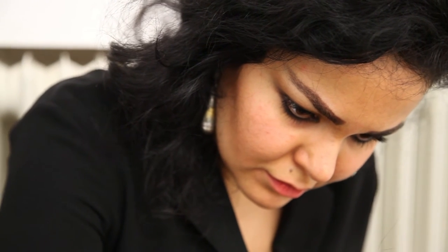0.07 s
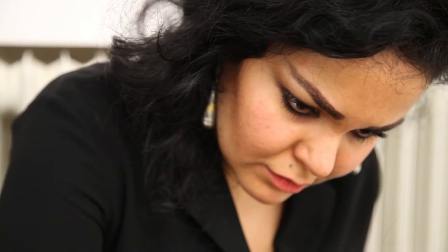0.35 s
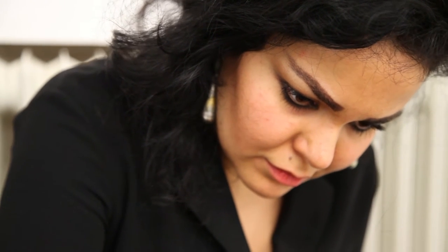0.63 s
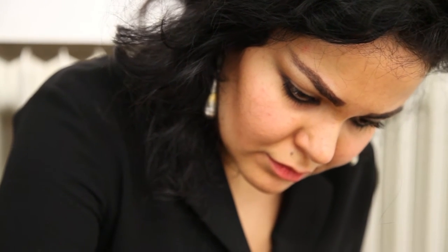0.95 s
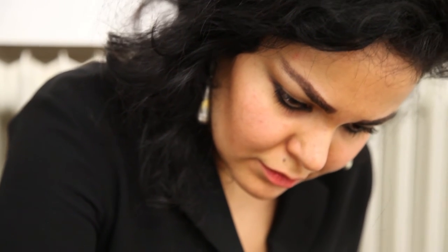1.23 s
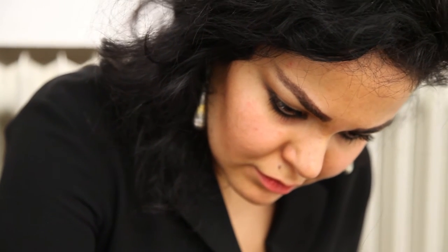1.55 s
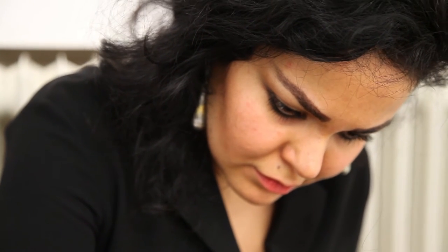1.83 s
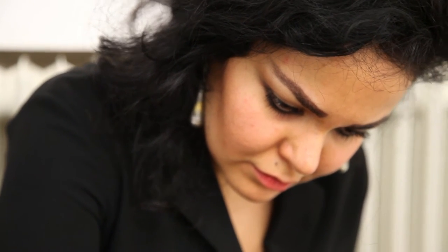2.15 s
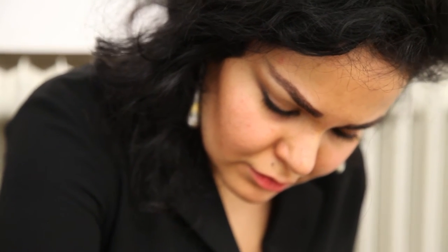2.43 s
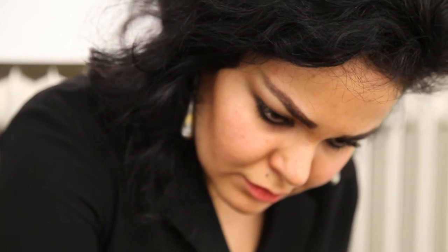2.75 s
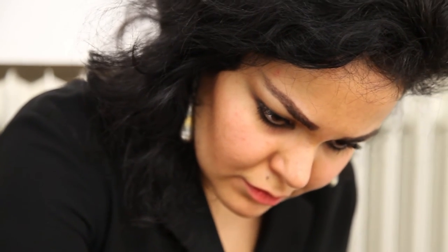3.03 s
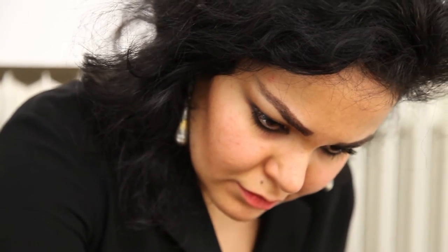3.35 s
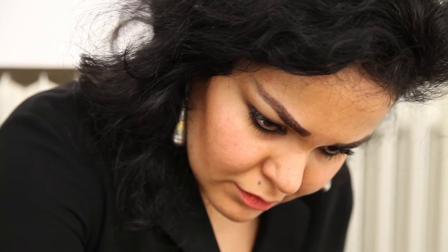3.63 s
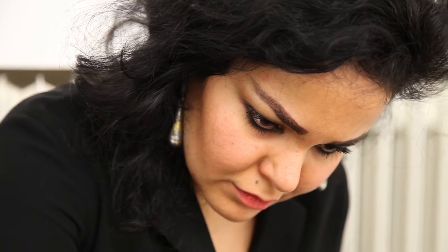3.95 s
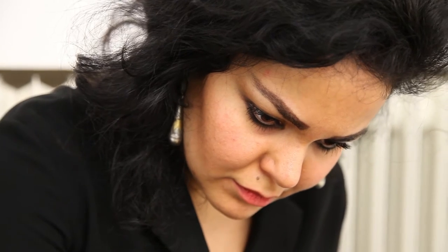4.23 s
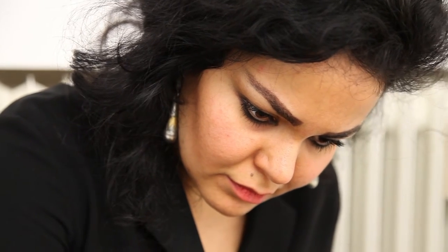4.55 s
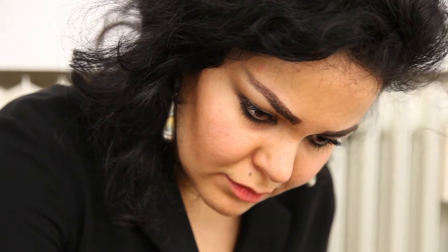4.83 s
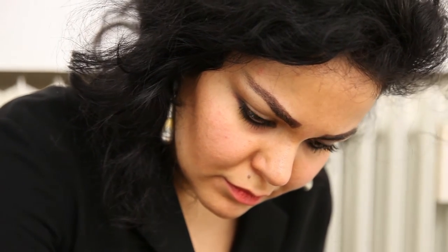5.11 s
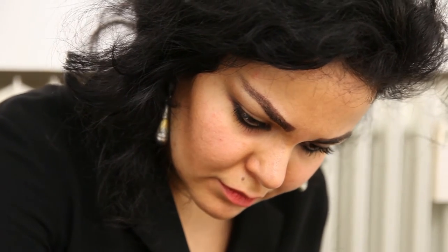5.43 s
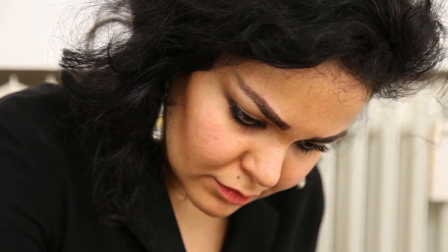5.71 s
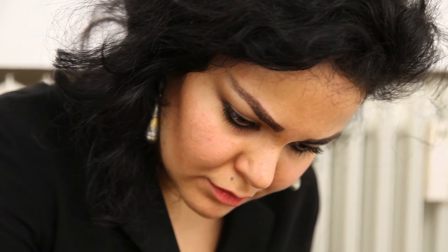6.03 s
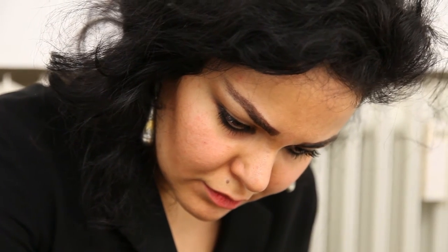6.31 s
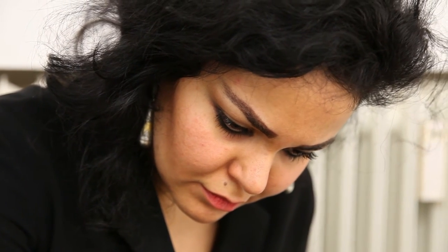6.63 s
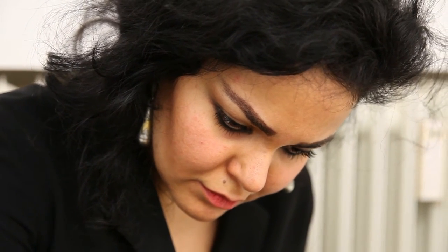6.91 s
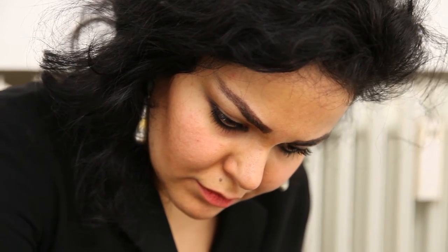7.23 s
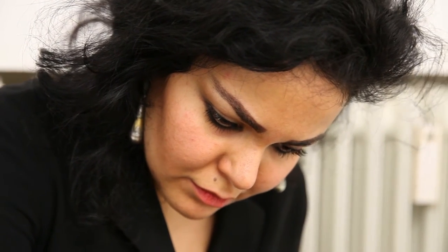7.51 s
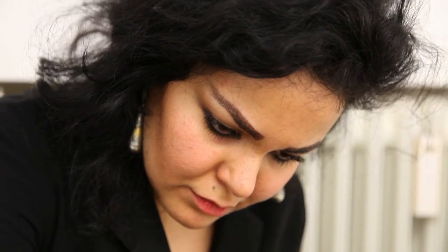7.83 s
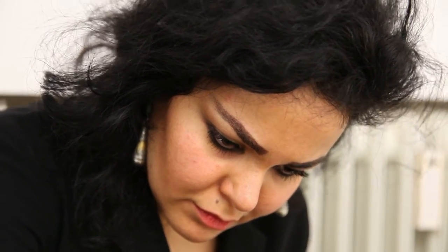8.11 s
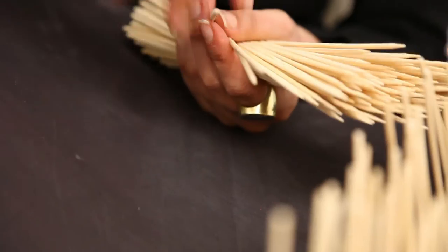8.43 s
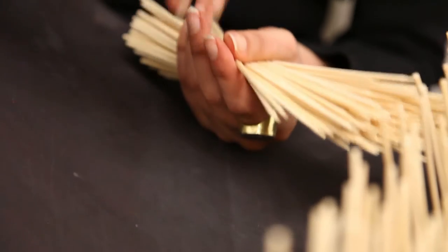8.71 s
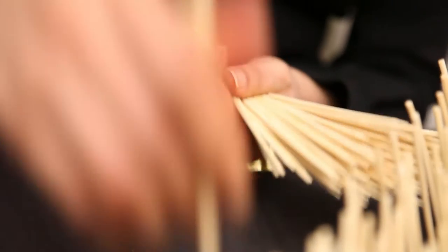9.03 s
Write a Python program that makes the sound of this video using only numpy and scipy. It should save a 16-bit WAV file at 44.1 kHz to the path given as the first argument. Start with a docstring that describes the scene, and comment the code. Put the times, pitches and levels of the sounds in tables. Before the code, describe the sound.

Close up in a small room with a constant soft hiss, wooden skewers are pushed into a cloth-covered form in two spells. Each mixes woody taps, short scrapes, fabric rustle and low bumps on the table. Before and between them come faint rubs and crisp clicks from the bundle. A quick swish of one skewer being drawn out leads into the second spell, which holds the deepest, loudest thump.

```python
"""Thin wooden skewers go into a fabric-covered form on a table, close-miked over steady hiss in a small room.
Skewers rub and their tips click as one is picked from the bundle. From 1.3 s hands work over the cloth:
shafts tap and ring, points scrape through the weave, and the pushes thump form and table.
Around 4.5 s the hands lift, leaving rubs and clicks in the bundle. At 6.6 s one shaft slides out,
and a second spell of pushing brings the heaviest thump, then eases off towards 9 s."""
import sys
import numpy as np
from scipy import signal
from scipy.fft import rfft, irfft
from scipy.io import wavfile
from scipy.ndimage import uniform_filter1d

SR = 44100
rng = np.random.default_rng(int(sys.argv[2]) if len(sys.argv) > 2 else 0)


def generate_wav(signal):
    """Clip the signal to [-1, 1] and save it as 16-bit WAV at the path in sys.argv[1]."""
    frames = np.transpose(np.atleast_2d(signal))
    scaled = np.clip(frames, -1, 1) * 32767
    pcm = np.round(scaled).astype(np.int16)
    wavfile.write(sys.argv[1], SR, pcm)


N = 399546
TIME = np.arange(N) / SR

# Cue levels are set ahead of each layer's gain; spectra give tone colour only.
# room tone: (frequency [Hz], level [dB])
HUSH_SPECTRUM = [(12, -36), (20, 3.5), (124, -2.5), (184, -7.5), (212, -7), (273, -8.5), (342, -8),
                 (521, -13), (888, -15), (2310, -19.5), (2580, -17), (3060, -20.5), (8170, -23.5),
                 (15200, -25.5), (16500, -35)]
# bumps on form and table: (time [s], level [dB], centre [Hz], clack relative to thump [dB])
KNOCK_CUES = [(0.004, -51.5, 350, -23), (0.657, -52.5, 201, -6), (1.387, -38.5, 366, -1),
              (1.496, -27.5, 210, -1.5), (1.657, -29, 118, -12), (2.051, -32.5, 220, -9),
              (2.103, -31.5, 125, -8), (2.224, -26.5, 295, -8.5), (2.525, -25, 205, -8.5),
              (2.548, -31, 169, -16), (2.5707, -19.5, 141, -12), (3.133, -36.5, 310, -3),
              (3.167, -30, 270, -1.5), (3.319, -34, 280, -7), (3.361, -33.5, 200, -9),
              (3.9665, -20, 241, -3.5), (3.986, -27.5, 250, -25), (4.071, -41, 453, -5),
              (4.192, -40, 530, -12), (6.845, -34, 120, -6), (7.062, -24, 175, -15.5),
              (7.285, -14, 107, -22), (7.578, -28.5, 408, -22), (7.76, -22.5, 146, -12),
              (7.787, -24, 146, -21), (8.081, -39, 66.4, -20), (8.358, -35.5, 286, -7),
              (8.525, -28, 131, -8), (8.737, -33.5, 304, -9), (8.98, -39, 372, -13)]
# resonances of the form on the table: (frequency [Hz], level [dB], t60 [s])
BODY_MODES = [(41, 4, 0.16), (86.6, -6.5, 0.19), (135, 0.5, 0.097), (184.7, 0.5, 0.059), (233, -0.5, 0.068),
              (292.5, 0, 0.072), (350.6, -5.5, 0.12), (434.7, -5, 0.13), (575.5, -5.5, 0.085),
              (816, -15, 0.1), (960, -2, 0.032)]
# low shudder of the loaded form: (frequency [Hz], level [dB])
RUMBLE_SPECTRUM = [(25, -14), (42, -4), (60, -1), (84, 9), (102, 6.5), (124, 6), (160, -4.5), (215, 2.5),
                   (290, 5), (360, 6.5), (430, 1.5), (500, -8), (610, -8.5), (720, -12.5), (900, -14.5),
                   (1400, -26.5), (2500, -62)]
# hard edge of a knock: (frequency [Hz], level [dB])
CLACK_SPECTRUM = [(200, -7.5), (450, 6.5), (650, 0.5), (950, 0), (1250, -14.5), (1700, -23), (4000, -31.5),
                  (16000, -63)]
# skewers rub within the bundle: (time [s], length [s], level [dB])
RUB_CUES = [(0.127, 0.11, -56.5), (0.439, 0.042, -54.5), (2.916, 0.043, -53), (3.026, 0.086, -54.5),
            (3.723, 0.16, -53), (3.985, 0.049, -51), (4.125, 0.13, -53.5), (4.358, 0.051, -51.5),
            (4.557, 0.08, -52), (4.963, 0.034, -51.5), (5.108, 0.25, -52), (5.448, 0.088, -50.5),
            (7.257, 0.035, -41), (8.192, 0.095, -52)]
# wood brushing wood: (frequency [Hz], level [dB])
RUB_SPECTRUM = [(1760, -27), (3000, -9.5), (4410, -5.5), (5220, -5.5), (5880, -3.5), (7510, 0.5),
                (12200, -9.5), (15100, -28), (16000, -83)]
# tips flick past each other: (time [s], level [dB], tip pitch [Hz])
CLICK_CUES = [(0.234, -27.5, 7600), (0.4713, -32, 8160), (4.366, -37, 8900), (4.629, -31, 7850),
              (4.7055, -38, 7560), (4.769, -30.5, 9300), (4.9766, -36, 8300), (5.5086, -33, 6900),
              (5.557, -25.5, 9700), (5.5824, -21.5, 7430), (5.598, -24, 9050), (6.572, -44, 8050),
              (7.0603, -32, 6800), (8.2404, -25, 9200), (8.2795, -34.5, 7510), (8.2946, -26.5, 8400),
              (8.9008, -33.5, 8400)]
# bright snap of a tip: (frequency [Hz], level [dB])
CLICK_SPECTRUM = [(800, -37), (2000, -15), (3500, -8.5), (6000, 3), (8200, 5.5), (10500, -6.5),
                  (16000, -18.5)]
# bending modes of a gripped skewer, split as it is not quite round: (multiple of pitch [ratio], level [dB])
SKEWER_MODES = [(.51, -0.5), (.62, -18), (.87, -34), (1.0, 9), (1.18, -8), (1.8, -13)]
# spells of work: (hands land [s], hardest press [s], hands gone [s], level at hardest press [dB])
HAND_SPELLS = [(1.276, 2.13, 4.486, -37.5), (6.77, 7.45, 9.4, -36)]
# hands on fabric: (frequency [Hz], level [dB])
CLOTH_SPECTRUM = [(350, -26.5), (600, 7.5), (812, 3), (984, 2), (1390, 1), (2150, 1.5), (4460, -0.5),
                  (5330, -5), (8160, -7.5), (9760, -10), (11700, -21), (14900, -21), (16000, -9.5)]
# a shaft taps the form or its neighbours: (time [s], level [dB], shaft pitch [Hz])
TAP_CUES = [(1.386, -33, 3400), (1.445, -31, 4430), (1.484, -30.5, 4220), (1.496, -27, 3250),
            (1.6377, -30.5, 2100), (1.7623, -23.5, 1770), (1.8501, -23, 4250), (2.204, -24.5, 1710),
            (2.3177, -29, 2100), (2.484, -31, 1740), (2.5267, -31.5, 3600), (2.5701, -20.5, 3010),
            (2.7255, -30.5, 2380), (3.166, -30, 3640), (3.3192, -33, 2180), (3.9664, -25, 1410),
            (3.992, -28.5, 4000), (4.1887, -29, 2550), (6.6167, -31, 6160), (6.8458, -36, 3170),
            (7.036, -23, 4250), (7.04, -25, 1980), (7.0611, -25.5, 4420), (7.1113, -22.5, 3290),
            (7.124, -29, 4350), (7.2900, -22, 3000), (7.377, -28, 3430), (7.424, -22.5, 3440),
            (7.5763, -23.5, 1900), (7.6066, -22, 2060), (7.7463, -25.5, 3350), (7.9026, -22.5, 2270),
            (8.319, -28, 3800), (8.984, -29, 3980)]
# woody tick of a shaft: (frequency [Hz], level [dB])
TAP_SPECTRUM = [(500, 7), (900, 12.5), (1400, 1), (2200, 6.5), (3800, 6.5), (5500, 1.5), (8000, -4),
                (11000, -13.5), (16000, -46)]
# a point goes through the cloth: (time [s], length [s], level [dB], shaft pitch [Hz])
PUSH_CUES = [(1.988, 0.084, -40.5, 2220), (2.166, 0.1, -49, 3450), (2.665, 0.25, -45.5, 4850),
             (3.099, 0.05, -48, 3730), (3.392, 0.087, -52, 3660), (7.239, 0.056, -38.5, 3250),
             (7.413, 0.021, -48, 3500), (7.569, 0.1, -48, 2600), (7.858, 0.25, -44, 3950),
             (8.09, 0.13, -51, 3960), (8.359, 0.17, -50.5, 4600), (8.658, 0.16, -51, 3600)]
# threads grating on wood: (frequency [Hz], level [dB])
SCRAPE_SPECTRUM = [(410, -1.5), (700, 2.5), (1560, -3.5), (2130, 0), (3370, 2.5), (4150, 3), (5400, -1),
                   (6920, 0.5), (14800, -8.5), (16000, -26)]
# a shaft sliding out: (frequency [Hz], level [dB])
SLIDE_SPECTRUM = [(470, -5.5), (800, -7), (878, -10), (1060, -5), (1480, -3), (1590, -5), (2290, -0.5),
                  (2790, -4), (4340, 0.5), (5050, -4), (6310, -0.5), (7510, -3), (9050, -15), (13000, -33)]
# reverb off the walls: (frequency [Hz], level [dB])
WALL_SPECTRUM = [(60, 17), (200, -11.5), (600, 15), (2000, 9), (4000, 7.5), (9000, 3.5), (16000, -4)]
# preamp hiss: (frequency [Hz], level [dB])
HISS_SPECTRUM = [(100, -9.0), (2000, -8.5), (6000, -7.5), (11000, -5.5), (16000, -5.5)]

CUTOFF_HZ = 16000
# a knock at FREE_RING_DB rings as long as the modes do; each RING_HALVES_DB louder halves that time
FREE_RING_DB, RING_HALVES_DB = -32.5, 15.5
REBOUND_S, REBOUND_DB = 0.016, -8


def from_db(db):
    """Decibels to gain."""
    return np.exp(np.asarray(db) * (np.log(10) / 20))


def rms_one(x):
    """Scale to unit power."""
    return x / np.sqrt(np.mean(x ** 2) + 1e-20)


def peak_one(x, size):
    """Scale so that the loudest stretch of size samples has unit power."""
    return x / np.sqrt(uniform_filter1d(x ** 2, size, mode="constant").max() + 1e-20)


def add(track, s, sound):
    """Mix a sound into a track at time s."""
    start = max(round(s * SR), 0)
    track[start:start + len(sound)] += sound[:max(N - start, 0)]


def drift(rate_hz):
    """Smooth random modulation of spread 1."""
    step, run_in = 40, 2000
    pole = np.exp(-2 * np.pi * rate_hz * step / SR)
    noise = rng.standard_normal(N // step + run_in + 2)
    slow = signal.lfilter([1], [1, -2 * pole, pole * pole], noise)[run_in:]
    return np.interp(np.arange(N) / step, np.arange(len(slow)), rms_one(slow))


def coloured(x, spectrum, tilt_db=0, size=4096):
    """Minimum-phase EQ with the given spectrum, tilted in dB per octave; unit power."""
    octave = np.log2(np.maximum(np.arange(size // 2 + 1) * SR / size, 1))
    hz, db = np.transpose(spectrum)
    shape_db = np.interp(octave, np.log2(hz), db) + tilt_db * np.clip(octave - np.log2(hz[0]), 0, None)
    cepstrum = irfft(np.log(from_db(shape_db)))
    cepstrum[1:size // 2] *= 2
    cepstrum[size // 2 + 1:] = 0
    impulse = irfft(np.exp(rfft(cepstrum)))
    return rms_one(signal.oaconvolve(x, impulse)[:len(x)])


def room_tone(whine_hz=15692):
    """The bed: a steady low hush and a faint electronic whine."""
    hush = from_db(-55) * coloured(rng.standard_normal(N), HUSH_SPECTRUM)
    return hush + from_db(-77) * np.sin(2 * np.pi * whine_hz * TIME)


def form_knocks(focus_db=6.0, scatter_db=-0.5, shudder_db=-18, shudder_t60=0.68, clack_t60=0.025):
    """Soft bumps wake the form's low modes, hard ones the higher and a clack; the form shudders on."""
    out, t = np.zeros(N), TIME[:SR // 2]
    hz, mode_db, t60 = np.transpose(BODY_MODES)[:, :, None]
    shudder_shape = from_db(shudder_db - 60 * t / shudder_t60) * (1 - np.exp(-t / 0.00077))
    for s, db, centre_hz, clack_db in KNOCK_CUES:
        # the firmer the push, the more the hand damps the form
        ring_t60 = t60 * max(2 ** ((FREE_RING_DB - db) / RING_HALVES_DB), 0.1)
        off_centre_db = focus_db * np.log2(hz / centre_hz) ** 2
        strength = from_db(mode_db - off_centre_db + scatter_db * rng.standard_normal(hz.shape))
        lag = rng.uniform(0, 0.0011, hz.shape)  # the bump spreads, so the modes start out of step
        rings = strength * np.sin(2 * np.pi * hz * (t - lag)) * from_db(-60 * t / ring_t60)
        thump = peak_one(rings.sum(0) * (1 - np.exp(-t * 2 * centre_hz)), size=256)
        shudder = coloured(rng.standard_normal(len(t)), RUMBLE_SPECTRUM) * shudder_shape
        burst = rng.standard_normal(len(t)) * from_db(-60 * t / clack_t60)
        clack = from_db(clack_db) * peak_one(coloured(burst, CLACK_SPECTRUM), size=128)
        # a brief, hard blow moves too little mass to rock the table
        low_cut = signal.butter(2, centre_hz / 3.1, "high", fs=SR, output="sos")
        add(out, s, from_db(db) * (signal.sosfilt(low_cut, thump + shudder) + clack))
        rocks_back_at = s + REBOUND_S * rng.uniform(0.869, 1.15)
        add(out, rocks_back_at, from_db(db + REBOUND_DB) * signal.sosfilt(low_cut, thump))
    return out


def room_reverb(send, t60=0.49, predelay_s=0.005):
    """The walls return a short diffuse tail."""
    t = TIME[:SR // 2]
    tail = coloured(rng.standard_normal(len(t)), WALL_SPECTRUM) * from_db(-60 * t / t60) * (t > predelay_s)
    return signal.oaconvolve(send, tail / np.sqrt(np.sum(tail ** 2)))[:N]


def friction(spectrum, per_s, spread_db, flutter_db, flutter_hz):
    """Fibres catch and let go: a rain of slips of uneven size, under a wavering pressure."""
    pressure_db = flutter_db * drift(flutter_hz)
    size_db = spread_db * np.minimum(rng.exponential(1, N), 4)
    slips = rng.standard_normal(N) * (rng.random(N) < per_s / SR)
    return coloured(slips * from_db(size_db + pressure_db), spectrum)


def bundle_rubs():
    """Skewers brush each other in airy strokes that swell and fade."""
    swells = np.zeros(N)
    for s, length, db in RUB_CUES:
        add(swells, s, from_db(db) * np.sqrt(np.hanning(round(length * SR))))
    return swells * friction(RUB_SPECTRUM, per_s=3000, spread_db=2.5, flutter_db=1.0, flutter_hz=42)


def skewer_ring(force, hz, width_hz):
    """A force rings the bending modes of one skewer; unit power."""
    out = 0
    for k, (multiple, db) in enumerate(SKEWER_MODES):
        radius = np.exp(-np.pi * width_hz * multiple / SR)
        angle = 2 * np.pi * min(hz * multiple, CUTOFF_HZ) / SR
        mode = signal.lfilter([1, 0, -1], [1, -2 * radius * np.cos(angle), radius ** 2], force)
        out = out + (-1) ** k * from_db(db) * (1 - radius ** 2) * mode
    return rms_one(out)


def contacts(cues, spectrum, even_hz, tilt_db, width_hz, ring_db, snap_db, scuff_db, scuff_s,
             chatter_t60, spread_db):
    """Two surfaces scuff, snap together and chatter in tiny collisions, which set the skewer ringing."""
    out, lead = np.zeros(N), SR // 50
    t = TIME[:SR // 12] - lead / SR
    scuff = from_db(scuff_db) * np.exp(-np.abs(t) / scuff_s)
    chatter = from_db(-60 * np.abs(t) / chatter_t60)
    press = np.where(t < 0, scuff, chatter)
    for s, db, hz in cues:
        force = press * rng.standard_normal(len(t)) * from_db(spread_db * rng.standard_normal(len(t)))
        force[lead] += from_db(snap_db)
        brightness = tilt_db * np.log2(hz / even_hz)  # the treble tilts up for pitches above even_hz
        touch = coloured(force, spectrum, brightness) + from_db(ring_db) * skewer_ring(force, hz, width_hz)
        add(out, s - lead / SR, from_db(db) * peak_one(touch, size=88))
    return out


def tip_clicks(slip_db=15, slip_hz=7260, scatter_octaves=0.19):
    """Tips flick past each other; one with less free length rings higher and brighter."""
    slips = []
    for s, length, db in RUB_CUES:  # every rub lets one more tip slip
        at = s + length * rng.random()
        hz = slip_hz * 2 ** (scatter_octaves * rng.standard_normal())
        slips.append((at, db + slip_db, hz))
    return contacts(CLICK_CUES + slips, CLICK_SPECTRUM, even_hz=6720, tilt_db=17,
                    width_hz=420, ring_db=-2.5, snap_db=18.5,
                    scuff_db=-25, scuff_s=0.0041, chatter_t60=0.017, spread_db=5.5)


def hand_effort(settle_s=0.19, bear_db_per_s=4.0, ease_db_per_s=5.5, lift_s=0.18):
    """Envelope of the hands: in each spell they settle, bear down, ease off and lift."""
    out = np.zeros(N)
    for land, hardest, gone, db in HAND_SPELLS:
        touch = np.clip((TIME - land) / settle_s, 0, 1) * np.clip((gone - TIME) / lift_s, 0, 1)
        slack_db = np.maximum(bear_db_per_s * (hardest - TIME), ease_db_per_s * (TIME - hardest))
        out += touch * from_db(db - slack_db)
    return out


def form_rumble(effort):
    """Friction under the working hands makes the form rumble."""
    return effort * friction(RUMBLE_SPECTRUM, per_s=2000, spread_db=1.16, flutter_db=2.9, flutter_hz=29)


def cloth_rustle(effort, drag_db=-9.5, settle_s=0.14):
    """Hands rub the cloth, each push drags it until it settles, and snagged threads tick."""
    drag = np.zeros(N)
    for s, length, db, _ in PUSH_CUES:
        stretch = np.clip((TIME - s) / length, 0, 1)
        release = np.exp(-np.maximum(TIME - s - length, 0) / settle_s)
        drag += from_db(db + drag_db) * stretch * release
    weave = friction(CLOTH_SPECTRUM, per_s=7600, spread_db=0, flutter_db=3.2, flutter_hz=26)
    snags = friction(SCRAPE_SPECTRUM, per_s=35, spread_db=3.5, flutter_db=-3.0, flutter_hz=8)
    return (from_db(-14.5) * effort + drag) * (weave + from_db(-16) * snags)


def shaft_taps():
    """Shafts tap the form or each other; one gripped shorter rings higher and brighter."""
    return contacts(TAP_CUES, TAP_SPECTRUM, even_hz=1790, tilt_db=3.5,
                    width_hz=165, ring_db=0, snap_db=9,
                    scuff_db=-13.5, scuff_s=0.0042, chatter_t60=0.016, spread_db=2.5)


def push_scrapes(width_hz=520, ring_db=1, crackle_db=-7):
    """The weave grates along each skewer going in, threads snag, and the shaft lends it a pitch."""
    out = np.zeros(N)
    grating = friction(SCRAPE_SPECTRUM, per_s=9800, spread_db=3.5, flutter_db=-1.5, flutter_hz=190)
    crackle = friction(SCRAPE_SPECTRUM, per_s=350, spread_db=0, flutter_db=2.0, flutter_hz=26)
    grating += from_db(crackle_db) * crackle
    for s, length, db, hz in PUSH_CUES:
        swell = np.sqrt(np.hanning(round(length * SR)))
        drive = grating[round(s * SR):][:len(swell)]
        ring = from_db(ring_db) * skewer_ring(drive, hz, width_hz)
        add(out, s, from_db(db) * swell * (drive + ring))
    return out


def shaft_slide(at_s=6.612, db=-40, attack_s=0.012, fade_db_per_s=67):
    """One shaft is drawn out in a quick swish that fades as it slows."""
    t = np.maximum(TIME - at_s, 0)
    envelope = (1 - np.exp(-t / attack_s)) * from_db(db - fade_db_per_s * t)
    return envelope * friction(SLIDE_SPECTRUM, per_s=13000, spread_db=0, flutter_db=-1.0, flutter_hz=65)


def scene():
    """Handling, room tone and a touch of reverb meet at one close microphone, panned centre."""
    thumps = from_db(1.46) * form_knocks()
    taps = from_db(-9) * shaft_taps()
    clicks = from_db(-5) * tip_clicks()
    pushes = from_db(0.5) * push_scrapes()
    effort = hand_effort()
    rumble = from_db(-3) * form_rumble(effort)
    cloth = cloth_rustle(effort)
    rubs = bundle_rubs()
    slide = shaft_slide()
    bed = room_tone()
    send = from_db(-16) * thumps + from_db(-8) * (taps + pushes + rubs) + from_db(-11) * clicks
    mono = bed + thumps + rubs + clicks + rumble + cloth + taps + pushes + slide + room_reverb(send)
    return np.array([mono, mono])


def record(dry):
    """The preamps add a thin hiss, opposite in polarity left and right; a steep filter cuts the top."""
    hiss = from_db(-63.5) * coloured(rng.standard_normal(N), HISS_SPECTRUM)
    high_cut = signal.ellip(10, .1, 70, CUTOFF_HZ, fs=SR, output="sos")
    return signal.sosfilt(high_cut, dry + hiss * [[1], [-1]])


dry = scene()
out = record(dry)
generate_wav(out)
```